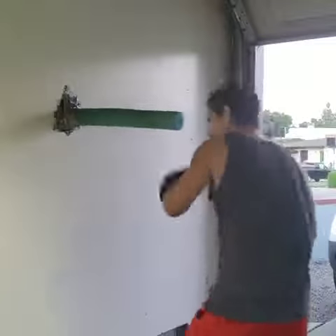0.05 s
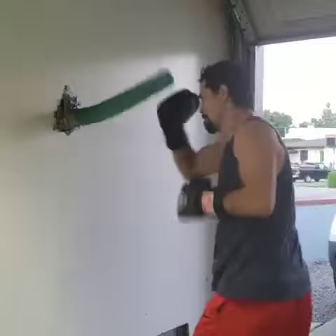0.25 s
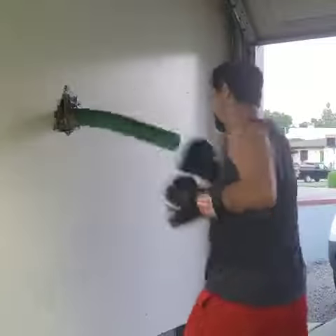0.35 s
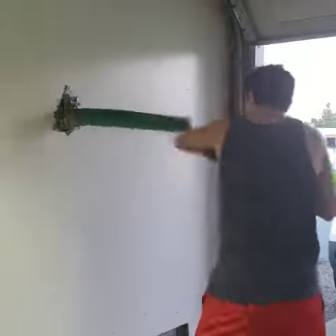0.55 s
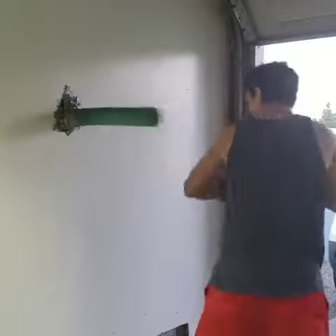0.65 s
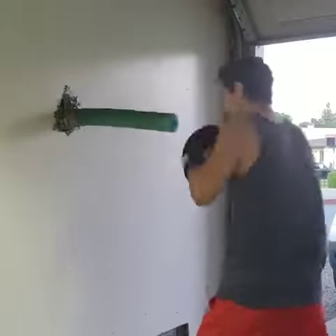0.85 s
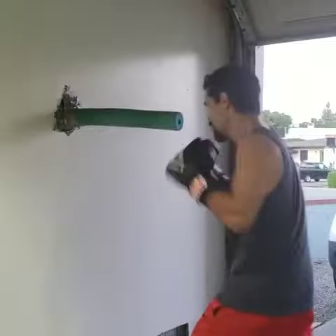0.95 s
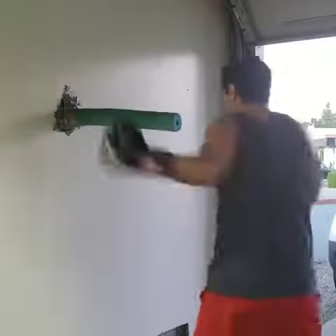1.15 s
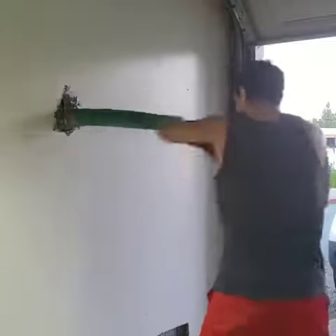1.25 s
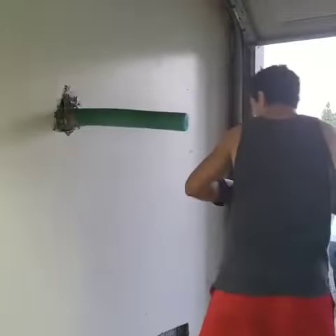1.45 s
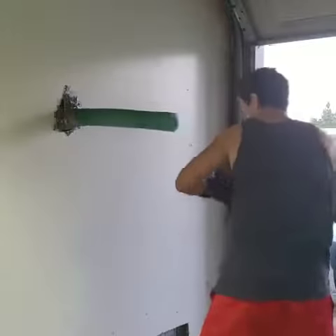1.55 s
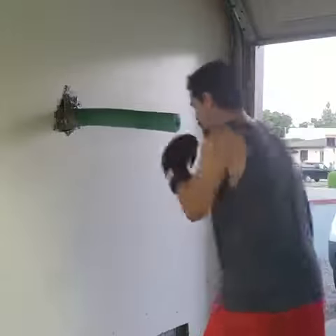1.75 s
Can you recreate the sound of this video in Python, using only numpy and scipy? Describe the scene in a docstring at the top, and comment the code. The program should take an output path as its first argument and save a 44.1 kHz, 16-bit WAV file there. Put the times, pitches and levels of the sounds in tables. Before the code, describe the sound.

Gloved punches smack a foam noodle fixed to a garage wall three times: a lighter hit, quickly a loud one, then another after a pause. Each leaves a low boom and brief hiss over faint footwork and outdoor noise.

```python
"""Punches on a foam noodle

Three gloved punches, an uppercut and two hooks, hit a foam noodle fixed to a garage wall.
Each impact gives a snap, a pressure pulse, a hollow knock and a crackle of foam, then drives the
low modes of wall and room and leaves a reverberant tail. A diffuse hiss lingers while the noodle
whips about; soft footwork, one click, a low hum and faint outdoor noise lie underneath."""
import sys
import numpy as np
from scipy import signal
from scipy.fft import rfft, irfft
from scipy.io import wavfile
from scipy.ndimage import uniform_filter1d

SR = 44100
rng = np.random.default_rng(int(sys.argv[2]) if len(sys.argv) > 2 else 0)


def pcm_store(signal):
    """Save signal as 16-bit PCM."""
    levels = np.round(np.clip(np.atleast_2d(signal), -1, 1) * 32767)
    wavfile.write(sys.argv[1], SR, levels.astype(np.int16).T)


N = 79380
TIME = np.arange(N) / SR
BIN_HZ = np.maximum(np.arange(N // 2 + 1) * SR / N, 1)

# The blows. Each row: start in seconds, pulse gain in dB, contact width in ms, snap gain in dB,
# knock gain in dB, knock pitch ratio, crackle, room and boom gains in dB, boom delay in seconds,
# boom centre in Hz, hiss level in dB, hiss length in seconds, swell level in dB.
PUNCHES = [(0.2350, -22, 0.14, -40, -14, 0.81, -32, -8, -8.5, .034, 72, -44, .15, -45),
           (0.5103, -8.5, 0.29, -32, 3, 0.98, -22.5, -0.5, 0.5, 0.019, 117, -43, .15, -46.5),
           (1.2444, -11.5, 0.23, -46, -3, 0.9, -31.5, -0.5, 1, 0.02033, 114, -42, 0.14, -43)]
# First reflections off wall, floor and ceiling. Each row: delay in ms, left gain, right gain.
REFLECTIONS = [(2.31, -0.083, 0.45), (3.73, -0.39, -0.48), (4.69, 0.12, 0.22), (7.07, -0.092, 0.16),
               (9.88, -0.3, 0.6), (19.4, 0.1, -0.1), (22.28, 0.13, 0.65), (23.94, -0.35, -.45)]
# Normal modes. Each row: frequency in Hz, relative level in dB, 60 dB decay time in seconds.
TUBE_MODES = [(404, -46, 0.027), (471, -30, 0.038), (712, -34, 0.094), (950, -56, 0.1),
              (1056, -22.5, 0.021)]
GARAGE_MODES = [(54, -64, .5), (69.2, -18.5, 0.38), (101.8, -18, 0.43), (109.96, -22.5, 0.32),
                (127.9, -20.5, 0.56), (157.8, -29.5, 0.59), (173.2, -31, 0.4), (231.4, -30, 0.71),
                (249.9, -28, 0.55), (288.3, -24, 0.57), (307.4, -25, 0.66), (394, -25, 0.27),
                (444, -35, 0.7)]
PANEL_MODES = [(119.4, -21.5, 0.19), (171.7, -20, .1), (305, -24.5, .1)]
# The uppercut's bending wave and the click. Each row: start in seconds, level in dB.
BENDS = [(0.2355, -26)]
CLICKS = [(0.885, -45)]
# Noise spectra. Each row: frequency in Hz, relative spectral density in dB.
SNAP_SPECTRUM = [(800, 15), (2000, 5), (4500, 0), (8000, -18), (13000, 6)]
CRACKLE_SPECTRUM = [(300, 4.5), (1100, -4), (2000, -3), (4400, -5.5), (7000, -8.5), (10000, -18),
                    (13000, -6.5)]
HISS_SPECTRUM = [(700, -2.5), (1700, 2), (2800, 4), (4500, 0), (5500, 2), (7000, 1), (9500, -1),
                 (12500, 4.5), (14000, -14)]
SWELL_SPECTRUM = [(1500, -36), (2600, 7.5), (3350, 5.5), (3750, -2), (4200, 10.5), (4750, 8.5), (5500, -31),
                  (8000, -7), (11500, -9), (14000, -17)]
TAIL_SPECTRUM = [(50, -6.5), (100, 11), (180, 3.5), (400, 0.5), (560, -3.5), (800, -5), (1150, -5),
                 (1800, -18), (3000, -21), (6000, -34), (13000, -32)]
CLICK_SPECTRUM = [(1500, -18), (4000, -36.5), (8000, -34.5), (12500, -25)]
OUTDOOR_SPECTRUM = [(15, -70), (25, -27), (65, -8), (87, -7), (237, -14), (264, -18), (353, -15),
                    (392, -19), (632, -21.5), (1360, -21), (2190, -41), (3010, -42), (7220, -53.5),
                    (11900, -35.5), (14000, -40)]
# Reverberation time. Each row: frequency in Hz, 60 dB decay time in seconds.
TAIL_T60 = [(60, 0.58), (300, 0.58), (1000, 0.38), (2500, 0.66), (6000, 0.42), (13000, 0.84)]
# Thuds and shuffles. Each row: peak time in seconds, level in dB, centre in Hz, width in seconds.
STEPS = [(0.195, -59.5, 201, 0.012), (0.81, -49.5, 66, 0.072), (0.9, -55.5, 323, 0.043),
         (0.958, -53.5, 63, 0.12), (1.665, -51.5, 290, .025)]
# Spectrum of a step. Each row: multiple of its centre frequency, relative spectral density in dB.
STEP_SPECTRUM = [(.4, -35), (.7, -14.5), (1, -6.5), (1.4, -16.5), (3, -23.5), (8, -60), (30, -95)]
# Partials of the hum. Each row: frequency in Hz, level in dB.
HUM_PARTIALS = [(62, -56.5), (118, -67), (237, -76)]
# Likeness of the two channels. Each row: frequency in Hz, left-right correlation.
CORRELATION = [(60, 1), (150, 0.77), (300, 0.92), (600, 0.3), (1200, 0.18), (3000, 0.057), (12000, -0.15)]
# Stereo balance. Each row: frequency in Hz, left minus right level in dB.
BALANCE = [(100, 1.3), (300, 0), (600, -2), (1200, -5), (2200, -4), (4400, -6.5), (8000, -4), (12500, -2)]

DIRECT_PAN_DB, REBOUND_HZ = -2.5, 180
CRACKLE_DELAY_S, CRACKLE_RISE_S, CRACKLE_FALL_S = 0.00062, 0.0021, 0.0024
BEND_START_HZ, BEND_END_HZ, BEND_GLIDE_S, BEND_T60_S = 470.4, 71, 0.02196, 0.14
BOOM_RISE_S, BOOM_WIDTH_OCT, BOOM_FOCUS_DB = 0.015, 0.54, 8.5
THUMP_DELAY_S, THUMP_GROWTH = 0.00078, 2.1  # growth in dB of thump per dB of boom
HISS_RISE_S, HISS_T60_S = 0.026, 0.56
SWELL_RISE_S, SWELL_T60_S = 0.052, 0.42
LOW_CUT_HZ, CUTOFF_HZ = 36, 13100


def pressure_pulse(age, contact_ms):
    """An impact radiates a pulse and its rebound; nearby surfaces return delayed copies."""
    age_ms = age * 1000
    pulses = pan(DIRECT_PAN_DB) * gaussian(age_ms, contact_ms)
    for delay_ms, left, right in REFLECTIONS:
        pulses = pulses + np.array([[left], [right]]) * gaussian(age_ms - delay_ms, contact_ms)
    rebound = signal.butter(1, REBOUND_HZ, "high", fs=SR, output="sos")
    return -signal.sosfilt(rebound, pulses + 1e-18)


def snap(age, t60=0.0029):
    """Brief contact has a broad spectrum: glove on foam sends a crack along the direct path."""
    return pan(DIRECT_PAN_DB) * (age > 0) * decay(age, t60) * unit_rms(diffuse(SNAP_SPECTRUM)[0])


def knock(age, tuning):
    """The hollow noodle rings in heavily damped modes, its pitch set by where it is hit."""
    return sum((-1) ** k * from_db(db) * ring(age, hz * tuning, t60)
               for k, (hz, db, t60) in enumerate(TUBE_MODES))


def crackle(age, roughness_db=1):
    """Foam cells crush so densely that their impulses merge into a burst of noise."""
    since = age - CRACKLE_DELAY_S
    rise = np.clip(since / CRACKLE_RISE_S, 0, 1)
    fall = np.exp(-np.maximum(since - CRACKLE_RISE_S, 0) / CRACKLE_FALL_S)
    grains = from_db(roughness_db * smooth_noise(samples=12))
    return rise * fall * grains * diffuse(CRACKLE_SPECTRUM)


def bending_wave():
    """Dispersion: high frequencies travel faster along the bent noodle, so the pitch falls."""
    out = 0
    for start, db in BENDS:
        age = np.maximum(TIME - start, 0)
        hz = BEND_END_HZ + (BEND_START_HZ - BEND_END_HZ) * np.exp(-age / BEND_GLIDE_S)
        phase = 2 * np.pi * np.cumsum(hz * (age > 0)) / SR
        out = out + from_db(db) * decay(age, BEND_T60_S) * np.sin(phase)
    return out


def boom(age, centre_hz):
    """Resonance: the shove builds up low modes of wall and room, favouring those near centre_hz."""
    modes = 0
    for hz, db, t60 in GARAGE_MODES:
        nearness = gaussian(np.log2(hz / centre_hz), BOOM_WIDTH_OCT)
        modes = modes + from_db(db + BOOM_FOCUS_DB * (nearness - 1)) * ring(age, hz, t60)
    return -np.clip(age / BOOM_RISE_S, 0, 1) * modes


def thump(age):
    """The shoved wall panel flexes briefly in damped free vibration."""
    return -sum(from_db(db) * ring(age - THUMP_DELAY_S, hz, t60) for hz, db, t60 in PANEL_MODES)


def hiss(age, level_db, length_s, swell_db):
    """Noise holds while the noodle whips, rings brighter near its end, then decays in the room."""
    late = age - length_s
    body = np.clip(age / HISS_RISE_S, 0, 1) ** .5 * decay(late, HISS_T60_S)
    swell = (age > 0) * gaussian(np.minimum(late, 0), SWELL_RISE_S) * decay(late, SWELL_T60_S)
    return (from_db(level_db) * body * rippled_noise(HISS_SPECTRUM)
            + from_db(swell_db) * swell * rippled_noise(SWELL_SPECTRUM))


def reverberation(age, gain_db=-21.5, rise_s=0.0012):
    """Dense reflections form a diffuse field in which each octave decays at its own rate."""
    bands = octave_bands(diffuse(TAIL_SPECTRUM))
    tail = sum(band * decay(age, at_hz(TAIL_T60, hz)) for hz, band in bands)
    return from_db(gain_db) * np.clip(age / rise_s, 0, 1) * tail


def footwork():
    """Weight shifts on concrete are slow forces, so they radiate dull swells of noise."""
    out = 0
    for peak_s, db, centre_hz, width_s in STEPS:
        spectrum = [(centre_hz * ratio, density) for ratio, density in STEP_SPECTRUM]
        out = out + from_db(db) * gaussian(TIME - peak_s, width_s) * diffuse(spectrum)
    return out


def click(t60=0.01, room_db=-9):
    """A light, bright click decays in two slopes: its own fast one and the room's slow one."""
    envelope = 0
    for start, db in CLICKS:
        age = TIME - start
        slopes = decay(age, t60) + from_db(room_db) * decay(age, HISS_T60_S)
        envelope = envelope + from_db(db) * (age > 0) * slopes
    return envelope * diffuse(CLICK_SPECTRUM)


def background(outdoor_db=-54.5, waver_db=5.5):
    """Diffuse noise enters the open door; a low hum wavers by slow amplitude modulation."""
    out = from_db(outdoor_db) * diffuse(OUTDOOR_SPECTRUM)
    for hz, db in HUM_PARTIALS:
        waver = np.interp(TIME, np.linspace(0, N / SR, 16), rng.standard_normal(16))
        partial = np.sqrt(2) * np.sin(2 * np.pi * (hz * TIME + rng.random()))
        out = out + from_db(db + waver_db * waver) * partial
    return out


def from_db(db):
    """Decibels to amplitude ratio."""
    return 10 ** (np.asarray(db) / 20)


def unit_rms(x):
    """Scale to unit power."""
    return x / np.sqrt(np.mean(x ** 2) + 1e-20)


def at_hz(points, hz):
    """Interpolate a table on a log-frequency axis."""
    freqs, values = np.transpose(points)
    return np.interp(np.log(hz), np.log(freqs), values)


def pan(db):
    """Left and right gains for a level difference."""
    return from_db(np.array([[db], [-db]]) / 2)


def gaussian(x, sigma):
    """A bell curve of height 1."""
    return np.exp(-.5 * (x / sigma) ** 2)


def decay(age, t60):
    """Unity until age zero, then exponential damping by 60 dB every t60 seconds."""
    return 1000 ** (-np.maximum(age, 0) / t60)


def ring(age, hz, t60):
    """A struck mode is a damped sinusoid, here panned by its frequency."""
    return pan(at_hz(BALANCE, hz)) * (age > 0) * np.sin(2 * np.pi * hz * age) * decay(age, t60)


def smooth_noise(samples):
    """A moving average of white noise, at unit power."""
    return unit_rms(uniform_filter1d(rng.standard_normal(N), size=samples))


def diffuse(spectrum):
    """A diffuse field reaches two microphones as partly correlated noise; unit power."""
    mid, side = rfft(rng.standard_normal((2, N)))
    correlation = np.clip(at_hz(CORRELATION, BIN_HZ), -.99, .99)
    signs = np.array([[1], [-1]])
    stereo = np.sqrt(1 + correlation) * mid + signs * np.sqrt(1 - correlation) * side
    gain = from_db(at_hz(spectrum, BIN_HZ) + signs * at_hz(BALANCE, BIN_HZ) / 2)
    return unit_rms(irfft(gain * (BIN_HZ < CUTOFF_HZ + 1000) * stereo, N))


def rippled_noise(spectrum, ripple_db=3.5, grain_db=0.3):
    """Diffuse noise with random narrow resonances and a fine grain in time."""
    hz = np.geomspace(700, 14000, num=70)
    colour = at_hz(spectrum, hz) + ripple_db * rng.standard_normal(len(hz))
    grain = from_db(grain_db * smooth_noise(samples=130))
    return diffuse(np.column_stack([hz, colour])) * grain


def octave_bands(x):
    """Overlapping octaves that sum to the whole, as pairs of centre in Hz and band."""
    centres = 60 * 2. ** np.arange(9)
    spectrum = rfft(x)
    return [(hz, irfft(spectrum * np.interp(np.log(BIN_HZ), np.log(centres), weights), N))
            for hz, weights in zip(centres, np.eye(len(centres)))]


def scene():
    """Superposition: the punches, all answered by the same room, add to the background."""
    out = background() + click() + footwork() + bending_wave()
    room = reverberation(TIME)
    for (start, pulse_db, contact_ms, snap_db, knock_db, tuning, crackle_db, room_db,
         boom_db, boom_delay_s, boom_hz, hiss_db, hiss_s, swell_db) in PUNCHES:
        age = TIME - start
        out += from_db(pulse_db) * pressure_pulse(age, contact_ms)
        out += from_db(snap_db) * snap(age)
        out += from_db(knock_db) * knock(age, tuning)
        out += from_db(crackle_db) * crackle(age)
        out += from_db(boom_db) * boom(age - boom_delay_s, boom_hz)
        out += from_db(THUMP_GROWTH * boom_db) * thump(age - boom_delay_s)
        out += hiss(age, hiss_db, hiss_s, swell_db)
        out += from_db(room_db) * np.pad(room, ((0, 0), (int(start * SR), 0)))[:, :N]
    return out


def record(dry):
    """Band limiting: the microphone drops the deep bass, and the top is cut steeply."""
    high_pass = signal.butter(2, LOW_CUT_HZ, "high", fs=SR, output="sos")
    low_pass = signal.ellip(12, .1, 90, CUTOFF_HZ, fs=SR, output="sos")
    return signal.sosfilt(low_pass, signal.sosfilt(high_pass, dry))


dry = scene()
out = record(dry)
pcm_store(out)
```